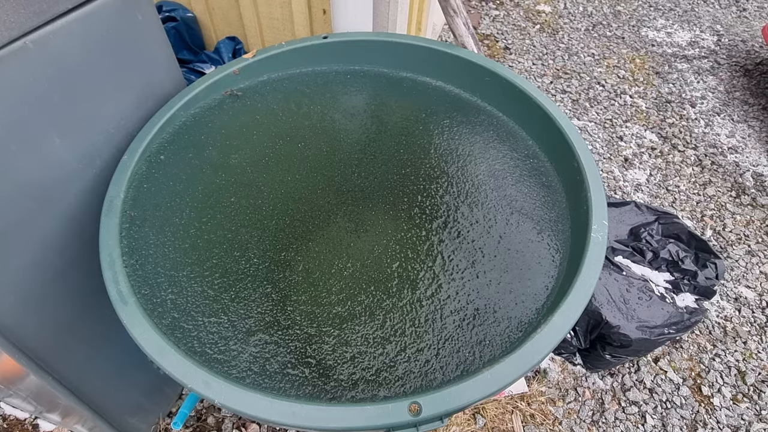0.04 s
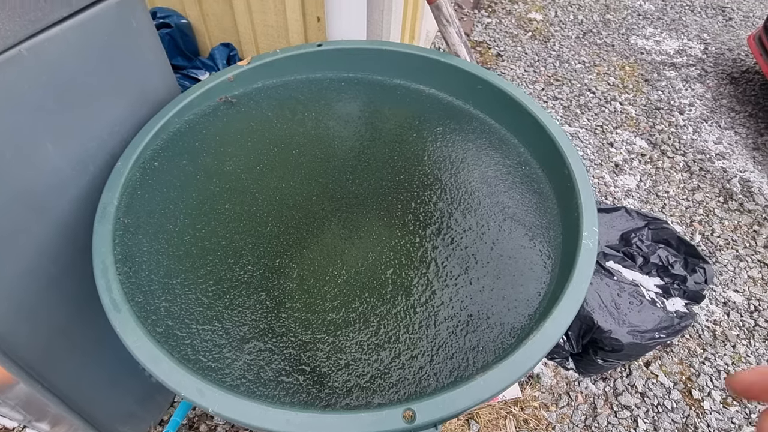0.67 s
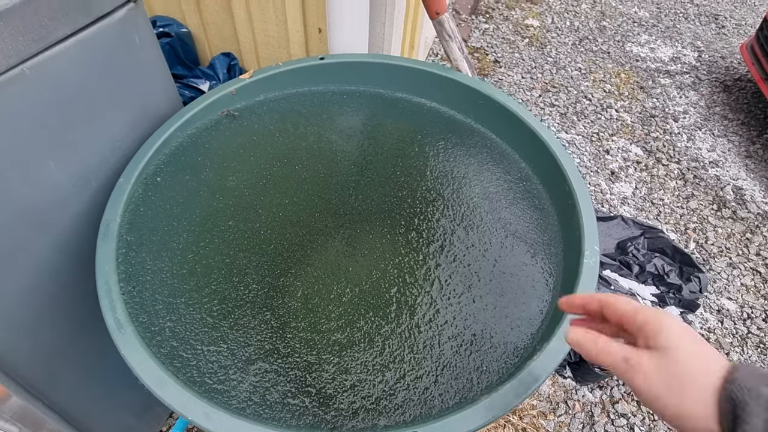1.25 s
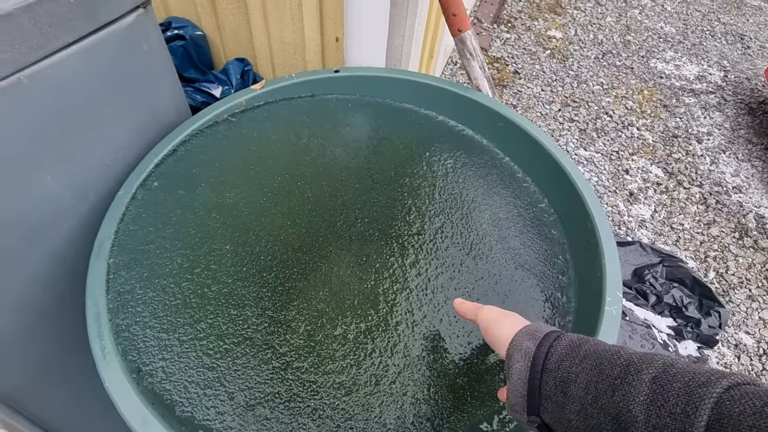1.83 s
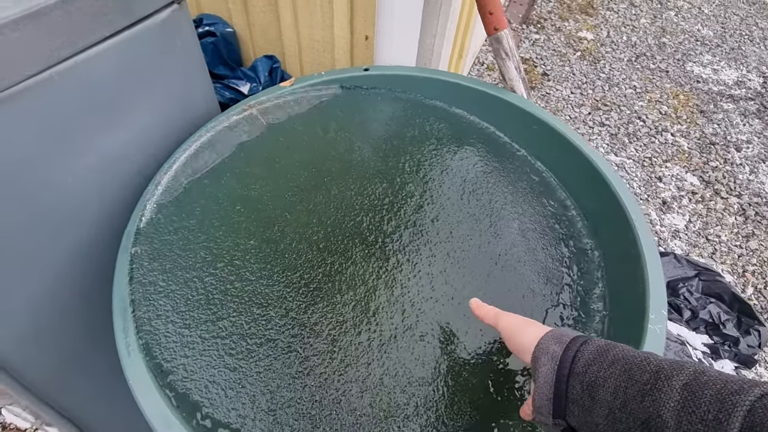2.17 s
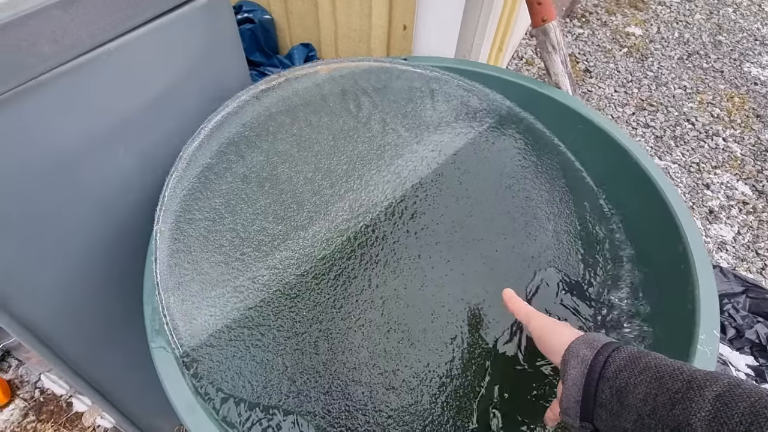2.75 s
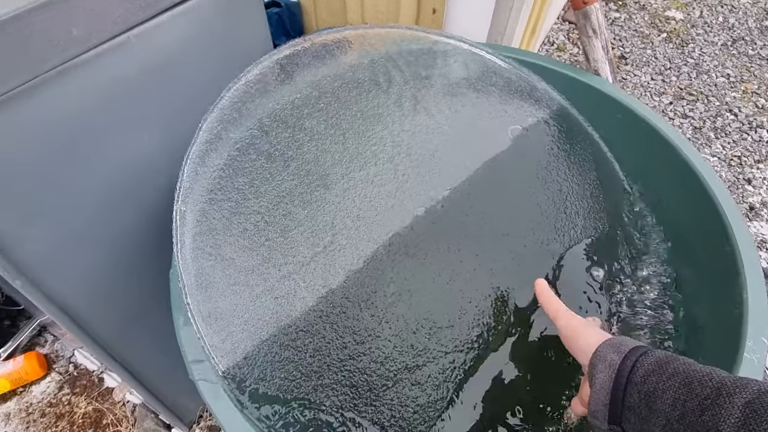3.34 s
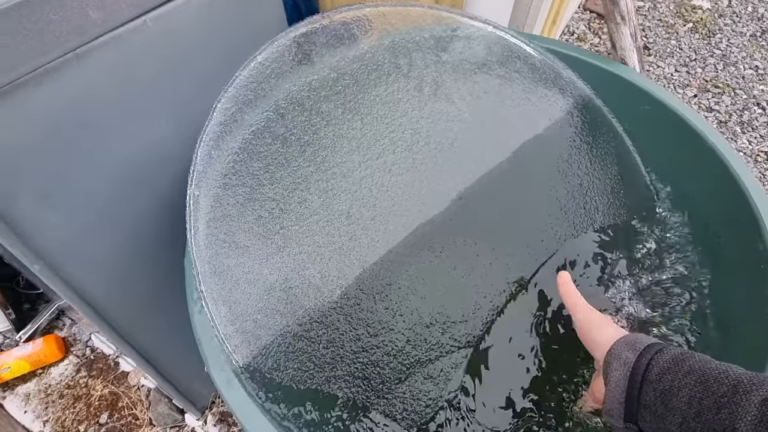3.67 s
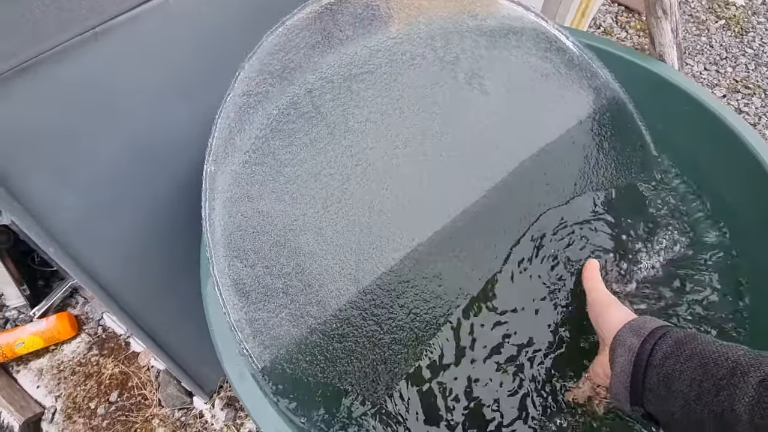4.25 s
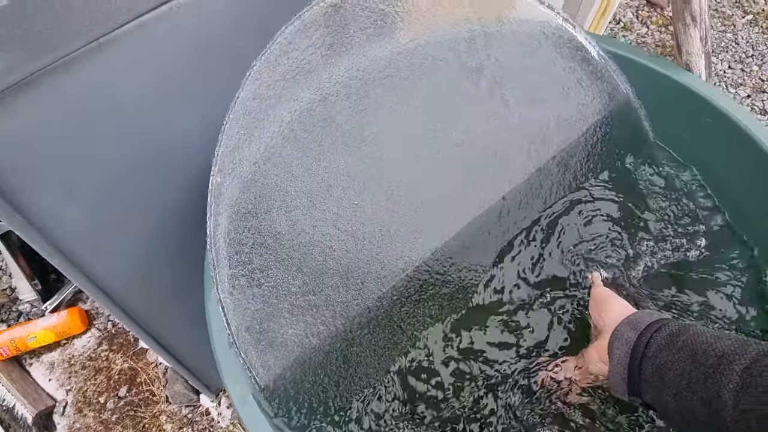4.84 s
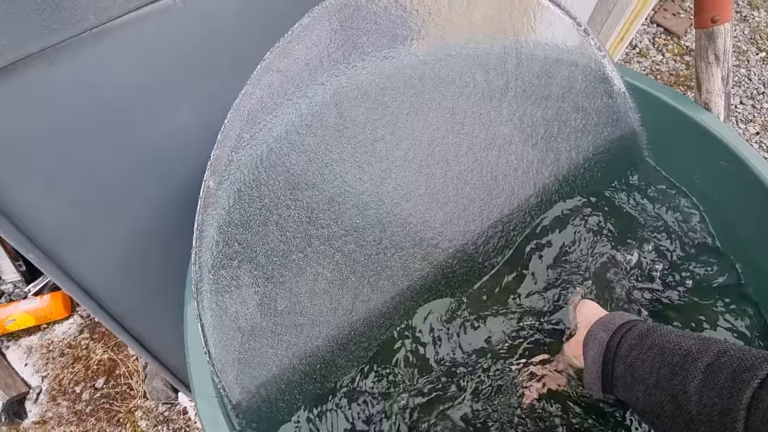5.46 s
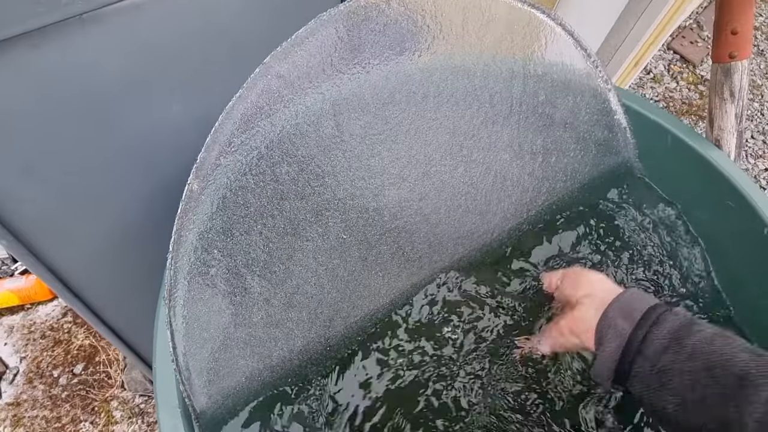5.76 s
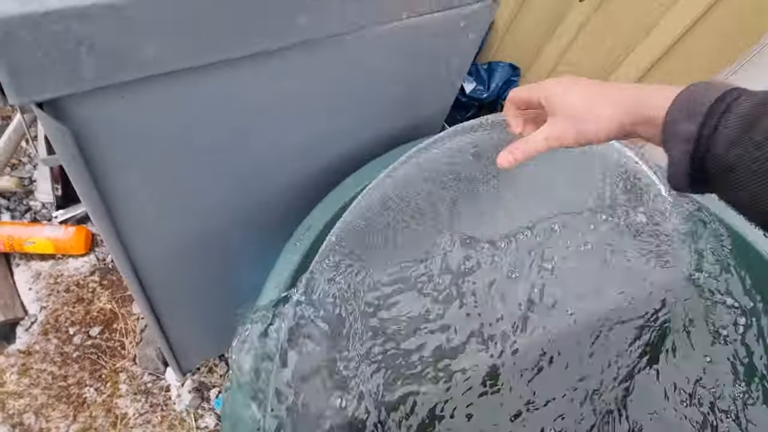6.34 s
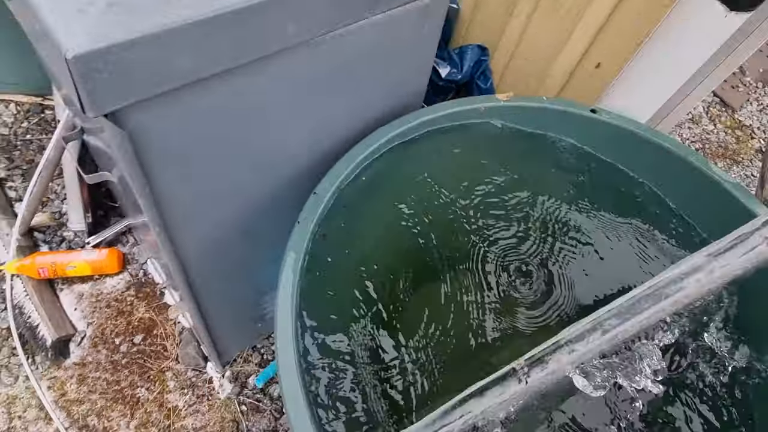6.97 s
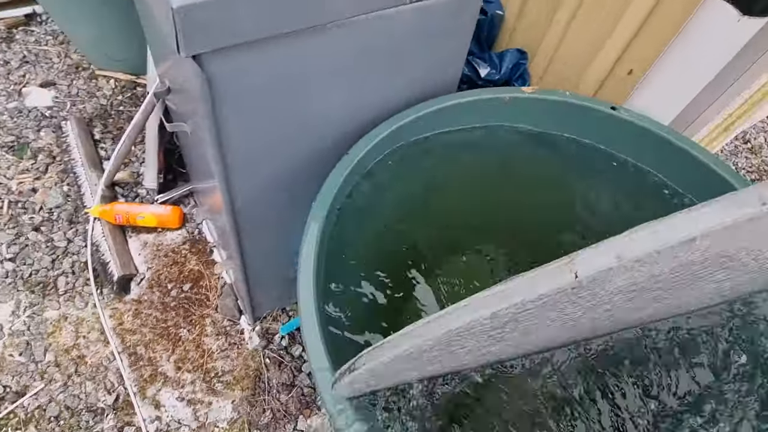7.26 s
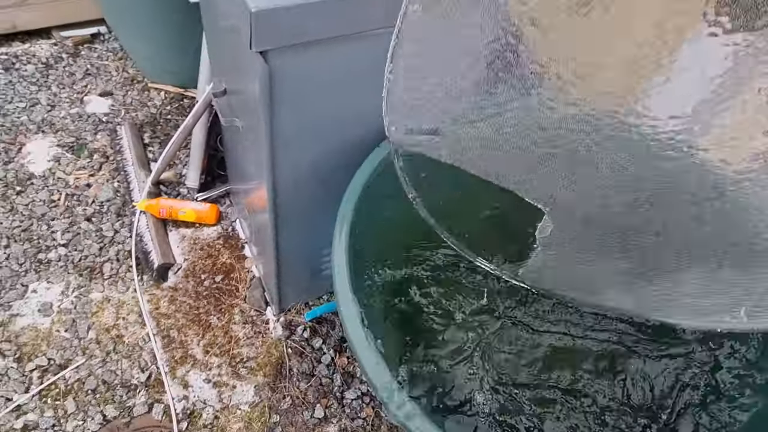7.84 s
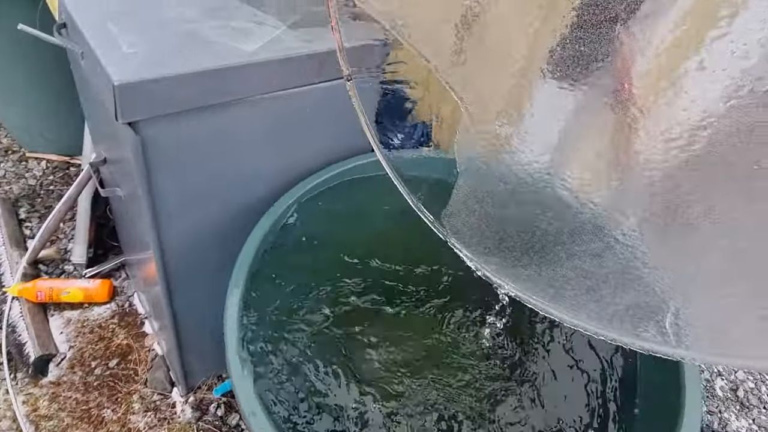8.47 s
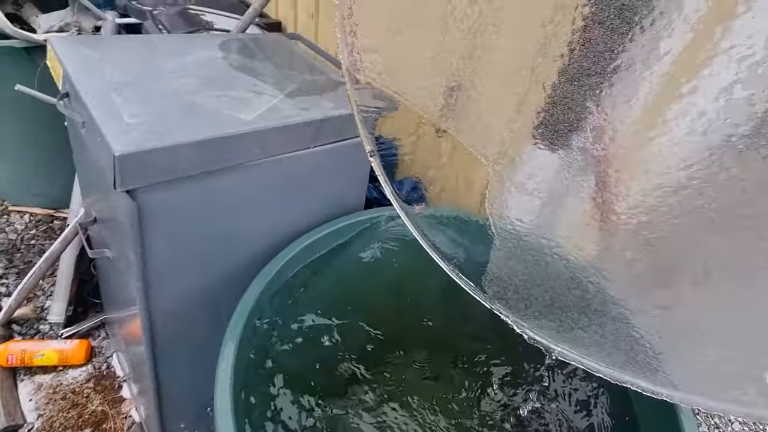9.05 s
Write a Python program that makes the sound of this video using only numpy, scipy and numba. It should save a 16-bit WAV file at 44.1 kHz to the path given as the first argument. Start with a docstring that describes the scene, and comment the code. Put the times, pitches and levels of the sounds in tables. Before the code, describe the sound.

A short, dry crackle comes right at the start, then faint open air and a low wind rumble. A sleeve rustles softly, and at about 1.6 seconds a sheet of ice snaps loose in a plastic tub of water with a small ping and a thud. From 2 to 3.3 seconds the ice scrapes and crackles along the tub. Water gurgles, gulps and plops over it from 3 seconds, easing off around 5. From about 5.9 seconds the sheet knocks dully against the tub and the water sloshes and slaps. The loudest splashing and pouring comes between 6.9 and 7.5 seconds as the ice is hauled out, with cracks and a brief low hum that sinks in pitch. Another scrape and bump follow near 7.7 seconds. From 8 seconds water trickles and drips into the tub, with a last short scrape at about 9.

```python
"""A short crackle; then, outdoors, ice snaps and water gurgles, sloshes, pours and drips as a hand
presses a round sheet of ice down in a plastic tub, tilts it and hauls it out. The ice cracks free,
scrapes the rim and bumps the tub into its low modes. The water is a crowd of bubbles, each a damped
oscillator: large ones gulp, small ones tinkle, the finest fizz. The tub wall reflects these sounds,
and wind rumbles beneath them."""
import sys
import numpy as np
from scipy import signal
from scipy.fft import rfft, irfft, next_fast_len
from scipy.io import wavfile
from scipy.ndimage import uniform_filter1d, map_coordinates
from numba import njit

SR = 44100
rng = np.random.default_rng(int(sys.argv[2]) if len(sys.argv) > 2 else 0)


def master_out(mix):
    """Clip the mix to full scale and print it as 16-bit PCM to the path in sys.argv[1]."""
    frames = np.transpose(np.atleast_2d(mix))
    ceiling = np.clip(frames, -1, 1)
    pcm = np.round(ceiling * 32767).astype(np.int16)
    wavfile.write(sys.argv[1], SR, pcm)


N = 401751

# Levels are relative within each table; balance is left minus right.
# Crackles, ice cracks and wet slaps: t/s, level/dB, body/dB, sizzle/dB, t60/s, balance/dB
CRACKS = [(.149, -15, -33, 13, 0.0048, 7), (.153, -36, -8.5, -4, .05, 3), (.170, -28.5, -7, 0, .017, -12.5),
          (.175, -24, -16.5, 0.5, 0.031, -1), (.185, -29, -8.5, -5, 0.0091, -3.5),
          (1.636, -38.5, -4.5, -5, .052, 0), (1.641, -32.5, -7, -1, .15, -0.5),
          (1.651, -31, -7, 0, .06, -3), (1.655, -18.5, -14, 5, 0.04, 3), (1.817, -45, -14, -5, 0.07, 2),
          (2.332, -36.5, -7, -17, 0.024, -2), (2.562, -34, -12, -19, .025, 5),
          (2.861, -32, -20, -6, .015, 2), (3.012, -36, 5, -10, 0.038, -1), (3.025, -27, 4, -5, 0.021, 0.5),
          (3.130, -26.5, -24, 11.5, 0.045, 1), (3.174, -32, -1.5, 4, .032, 1.5),
          (3.201, -25.5, -10.5, 6, 0.024, 0), (3.278, -26.5, -11, 19, 0.021, 2),
          (3.745, -36, -20, 6, .027, -2), (4.088, -35.5, -9, 0, .022, -2), (4.319, -37, -7, -7, 0.023, -3),
          (4.540, -27.5, -29, 23, .012, -4), (5.062, -37.5, 6, 7, .04, 1), (5.070, -24.5, -7, -3, .028, -2),
          (5.088, -38, 2, -3, .04, -1), (5.712, -26.5, -27.5, 33, 0.013, 5),
          (5.864, -32.5, 1.5, -4, 0.027, 1), (6.242, -29, -7, 14, 0.07, 2),
          (6.377, -31.5, 3.5, 1, 0.014, 2), (6.727, -27.5, -22, -1, .02, 10),
          (6.868, -24, 0.5, 1.5, 0.022, -2), (6.906, -17.5, 0.5, -8, .012, -5),
          (7.116, -21.5, -11, -2, .012, -2), (7.136, -17, -11, 4, .016, -4),
          (7.159, -15.5, -6.5, 1, 0.012, -4.5), (7.285, -20, -2.5, -15, .011, -2),
          (7.713, -20, -13, -11, 0.019, 4), (7.721, -23.5, -22, -2, 0.084, 2),
          (7.993, -28.5, -6, 11, 0.026, -4), (8.050, -18.5, -18, 3, 0.028, 0),
          (8.129, -27.5, -16, 16, .04, -8.5), (8.286, -28, -13, 3, .03, 1), (8.301, -29, -18, -6, .039, 4),
          (8.335, -31, -7.5, -6, 0.031, 0), (8.548, -30.5, -27, -3, .016, 9)]
# Buffets of wind and handling: t/s of the peak, half-width/s, level/dB
BUFFETS = [(.54, 0.082, -48.5), (1.0, 0.091, -50), (1.7, .06, -53), (2.42, 0.22, -57.5),
           (6.32, 0.14, -52.5), (7.58, .15, -41), (8.1, .2, -52), (8.46, 0.082, -46)]
# Low booms of water and sheet: t/s, f/Hz, level/dB, t60/s
BOOMS = [(1.641, 200, -25, 0.057), (1.675, 69, -40, 0.28), (3.009, 270, -29.5, 0.051),
         (5.864, 268, -24, 0.067), (6.240, 300, -33, 0.045), (6.363, 349, -23.5, 0.082),
         (6.370, 247, -19, 0.074), (6.713, 229, -39, .15), (6.752, 197.6, -28.5, 0.29),
         (7.378, 207, -25, 0.14), (7.419, 190, -24, 0.26), (7.809, 372, -30, 0.1), (8.09, 130, -31, 0.071),
         (8.446, 55.3, -21.5, 0.093), (9.065, 195, -33, 0.18)]

# Spectra of the crackling clicks, wind rumble and open air: f/Hz, level/dB
CRACK_SPECTRUM = [(100, -45.5), (600, -44), (1500, -2), (4200, 6), (7000, 1), (10800, -3), (13000, -1.5),
                  (16000, -3.5)]
RUMBLE_SPECTRUM = [(10, -34), (28, -10.5), (50, 2.5), (80, 2.5), (105, -4.5), (200, -21.5), (500, -70)]
AIR_SPECTRUM = [(60, -20), (150, -6.5), (360, 3), (480, -3.5), (1500, -14), (4000, -25.5), (8000, -36),
                (10800, -38), (13000, -27.5), (16000, -32)]
# Spectra of the water's four bands, low to high: f/Hz, level/dB
HEAVE_SPECTRUM = [(60, -28), (110, -5), (150, -7), (198, -0.5), (250, -3.5), (330, -7.5), (450, -26),
                  (900, -60)]
GULP_SPECTRUM = [(200, -32), (330, 3.5), (390, -2.5), (470, -2), (640, -1), (810, -3.5), (1000, 0),
                 (1600, -19)]
SPLASH_SPECTRUM = [(600, -12.5), (950, -4.5), (1200, -0.5), (1800, -3), (2400, -3.5), (3200, -1.5),
                   (5000, -19)]
SPRAY_SPECTRUM = [(1500, -26), (3000, -3), (4200, -2.5), (6000, -4), (8000, -4), (10800, -6), (13000, 0.5),
                  (16000, -2.5)]

# Flow over and off the sheet: t/s, level/dB, gulps re level/dB, spray re level/dB,
# churn (0 gentle gurgling, 1 broken splashing)
FLOW = [(1.75, -76.5, 3, 3, .8), (2.45, -67.5, 0, 6.5, 0.3), (2.98, -62, 1, 4, .35),
        (3.25, -48.5, -1, -0.5, 0.23), (3.85, -48, 5, -2, .18), (4.25, -52, -3, 2, .2),
        (4.75, -56.5, -5, .5, 0.21), (5.25, -61, 0, -1, .2), (5.53, -62.5, 0.5, 0.5, 0.5),
        (5.88, -53, -1.5, -2, 0.4), (6.08, -42, -7.5, 3.5, 0.28), (6.33, -46, -1, -0.5, .85),
        (6.6, -56, 2.5, 0, 0.8), (6.92, -33, -5.5, 4, .75), (7.42, -34, -2, -1, 0.35),
        (7.62, -46, -1, 1, 0.65), (7.92, -53.5, 0, 5.5, 0.95), (9.1, -61, -7, 5, .6)]
# Heave of the whole body of water: t/s, level/dB
ROCKING = [(1.8, -68), (3.4, -62.5), (5.4, -67.5), (6.1, -57), (6.45, -43.5), (6.58, -53.5), (6.85, -43),
           (7.55, -38), (7.92, -54.5), (9.1, -64)]
# Position of the splashing: t/s, balance/dB
SPLASH_BALANCE = [(1.8, 1), (5.9, 0), (6.3, 2.5), (6.9, 1.5), (7.35, -2), (7.75, 1.5), (8.1, -2.5),
                  (8.5, 3), (9.1, 3.5)]
# Surges: t/s, hold/s, level/dB, gulps re level/dB, spray re level/dB
SCRAPES = [(1.88, 0.032, -52, -5.5, 0), (1.985, 0.043, -50, -3.5, 3.5), (2.035, 0.023, -45.5, -3, -3.5),
           (2.335, 0.047, -51, -3, 4.5), (2.53, .04, -43.5, -1, -1), (2.62, .06, -61, 0, 9),
           (2.705, 0.022, -49, -1, -3.5), (2.77, 0.057, -57, 0, 6.5), (2.91, 0.018, -47.5, -4.5, -2.5),
           (3.012, .028, -38, 7, -2), (3.135, 0.016, -43.5, -6, 2), (3.175, 0.039, -41.5, -3, -2),
           (3.255, 0.031, -46, -4, 5.5), (7.70, 0.048, -38, -1, 13), (7.78, 0.022, -43, -4, 12),
           (9.06, .06, -40.5, -0.5, 8)]  # the ice edge grinds along the tub
GURGLES = [(2.27, 0.052, -56.5, 0, -11), (3.325, .015, -42.5, -8, -1), (3.425, 0.05, -40.5, -6, -2.5),
           (3.72, 0.036, -51, 7.5, 7.5), (3.79, 0.058, -43.5, 3, -3), (3.885, 0.04, -43, 2, -5.5),
           (3.995, 0.044, -43, 3, -10.5), (4.09, 0.037, -44, -5, -4), (4.175, .025, -46.5, 2, -18),
           (4.317, .02, -41.5, -6, -1.5), (4.39, .065, -47, -1, 1), (4.55, .04, -53, 4, 1),
           (4.70, 0.012, -52, -9, 4.5), (5.298, 0.019, -47, -9, -1.5), (5.425, 0.026, -54.5, 0, 2),
           (5.60, 0.02, -46.5, -7, 3), (5.708, .03, -48.5, -7, -1.5), (5.955, .045, -31, -13, -1)]  # water wells over sheet and hand
SLOSHES = [(5.868, .035, -41.5, 4.5, -17), (6.17, .035, -38, 4, 6.5), (6.243, 0.017, -41, 2, 2),
           (6.37, 0.022, -44, 5.5, -2), (6.425, 0.044, -40.5, -1.5, 0), (6.672, .02, -47, -3, 2),
           (6.75, .035, -35.5, -5, -3), (6.92, 0.082, -24.5, -9.5, -1), (7.065, .035, -29, -9, -6),
           (7.335, .03, -28, -7, -5), (7.385, 0.045, -30.5, 1.5, 0.5), (8.17, 0.028, -41, 0, 4)]  # hand and sheet shove the water
DRIBBLES = [(7.982, .028, -43, -4, 7.5), (8.032, 0.036, -32.5, -15, 2.5), (8.10, 0.059, -45.5, -6, 11),
            (8.297, 0.033, -33.5, -18, -8), (8.355, 0.036, -52, -9, 4), (8.51, 0.035, -52.5, -13, 14.5),
            (8.695, 0.0087, -64, -10, 7), (8.778, 0.015, -48.5, -4, 8.5), (8.82, 0.051, -54.5, -8.5, 10)]  # runnels fall from the lifted sheet
# Character of each kind of surge: attack/s, release t60/s, heave re gulps/dB, churn
SCRAPE_SHAPE = (.018, 0.16, -16, .9)
GURGLE_SHAPE = (.01, 0.24, -18.5, .24)
SLOSH_SHAPE = (.015, 0.157, -2, 0.78)
DRIBBLE_SHAPE = (0.03, 0.08, -5.5, .85)

# Drops, bubbles and short plopping knocks: t/s, starting f/Hz, level/dB, t60/s
PLOPS = [(2.244, 1980, -46, .034), (2.298, 900, -44.5, .05), (2.331, 1740, -37.5, .034),
         (2.705, 2190, -39.5, .043), (3.058, 434, -30, .059), (3.234, 2580, -32, .035),
         (3.436, 1830, -34, .027), (3.522, 993, -33.5, .054), (3.62, 400, -38, .13),
         (3.657, 1590, -32.5, .029), (3.721, 705, -30.5, .085), (3.790, 550, -27, .19),
         (3.812, 400, -32, .15), (3.892, 476, -31, .085), (3.918, 364, -27, .083), (4.03, 450, -34, .12),
         (4.319, 1020, -24, .035), (4.394, 990, -28, .036), (4.642, 3220, -29.5, .022),
         (4.931, 5600, -38, .008), (5.158, 2360, -36.5, .043), (5.248, 5700, -41, .014),
         (5.300, 2790, -27.5, .02), (5.608, 2950, -30.5, .009), (5.953, 1620, -25.5, .036),
         (5.964, 1150, -27, .039), (5.977, 1270, -20, .04), (5.978, 2930, -14, .017),
         (5.985, 1066, -21.5, .05), (6.007, 950, -30, .05), (6.040, 1025, -31.5, .072),
         (6.962, 780, -16.5, .03), (6.996, 1130, -18, .011), (7.001, 2460, -21, .022),
         (7.115, 748, -21, .025), (7.135, 815, -14.5, .022), (7.159, 797, -15.5, .022),
         (7.212, 1410, -20, .027), (7.283, 2140, -22.5, .027), (7.325, 1860, -19, .04),
         (7.352, 1420, -20, .042), (7.358, 870, -22, .043), (7.392, 705, -26.5, .06),
         (7.418, 534, -26.5, .046), (7.428, 1110, -23.5, .036), (7.540, 1450, -26.5, .021),
         (7.967, 4170, -26, .012), (7.992, 1280, -25.5, .037), (8.031, 2620, -14.5, .014),
         (8.032, 4700, -20, .017), (8.127, 5200, -21, .017), (8.177, 5650, -18, .01),
         (8.428, 4800, -23.5, .021), (8.458, 5360, -22, .015), (8.603, 1960, -29.5, .014),
         (8.668, 6700, -27.5, .012), (8.922, 6860, -28, .006), (8.990, 5800, -25.5, .004)]
# Slowly rising bubbles: t/s, starting f/Hz, level/dB, life/s
BLOOPS = [(4.175, 561, -51, 0.058), (4.600, 1210, -57, 0.043), (4.965, 734, -56, 0.058),
          (5.320, 1150, -58, .042), (8.711, 515, -38, .072)]
# Bumps of the sheet on the tub: t/s, level/dB
KNOCKS = [(5.863, -20.5), (5.886, -22.5), (6.201, -21.5), (6.247, -23), (6.375, -22), (6.850, -18.5),
          (6.868, -15), (6.9043, -14.5), (7.752, -18.5), (8.165, -26)]
# Modes of the filled tub: f/Hz, level/dB, t60/s
TUB_MODES = [(200, -22, 0.12), (309, -4.5, 0.04), (387, 0, 0.038), (576, 0, 0.03), (790, 0, 0.015),
             (1480, -3, 0.0096)]
# Air pocket under the lifted sheet: t/s, f/Hz, level/dB
POCKET = [(6.88, 110.5, -75), (6.95, 105.6, -43), (7.01, 97.8, -36), (7.08, 87.4, -43), (7.17, 82, -39),
          (7.24, 82, -44), (7.32, 80, -75)]


def amp(db):
    """Amplitude grows tenfold every 20 dB."""
    return 10 ** (np.asarray(db) / 20)


def unit(x):
    """Normalisation to an rms of 1."""
    return x / np.sqrt(np.mean(x ** 2) + 1e-20)


def curves(rows):
    """Linear interpolation of each column after the time, one value a sample."""
    times, *columns = np.transpose(rows)
    return [np.interp(np.arange(N) / SR, times, column) for column in columns]


def wobble(rate):
    """Spline interpolation through random knots, rate of them a second."""
    return map_coordinates(rng.standard_normal(int(N * rate / SR) + 4), [np.arange(N) * rate / SR])


def colour(x, spectrum):
    """Filtering multiplies the spectrum by a gain: (f/Hz, level/dB) points on a log axis."""
    n = x.shape[-1]
    padded = next_fast_len(n + 2048)
    hz, db = np.transpose(spectrum)
    gain = amp(np.interp(np.log(np.fft.rfftfreq(padded, 1 / SR) + 1), np.log(hz), db))
    return irfft(rfft(x, padded) * gain, padded)[..., :n]


def noise(spectrum, side_db, size=N):
    """Coloured noise of rms 1; the side signal decorrelates the ears."""
    mid, side = colour(rng.standard_normal((2, size)), spectrum) * amp([[0], [side_db]])
    return unit(np.array([mid + side, mid - side]))


def pan(db):
    """An interaural level difference places a source left or right."""
    return amp(np.array([[.5], [-.5]]) * db)


def add(out, start, sound):
    """Superposition of a sound on out, from start in seconds."""
    part = out[:, max(round(start * SR), 0):][:, :sound.shape[-1]]
    part += sound[..., :part.shape[1]]


@njit
def ring(rows, size, sr):
    """Damped oscillators that glide upward, as bubbles do near the surface."""
    out = np.zeros((2, size))
    for k in range(len(rows)):
        onset, hz, gain, t60, rise, ear_phase = rows[k]
        start = int(onset * sr)
        for i in range(min(int(t60 * sr), size - start)):
            t = i / sr
            phase = 2 * np.pi * hz * t * (1 + rise * t / t60 / 2)
            level = gain * np.exp(-np.log(1000) * t / t60) * (1 - np.exp(-3 * hz * t))
            out[0, start + i] += level * np.sin(phase + ear_phase / 2)
            out[1, start + i] += level * np.sin(phase - ear_phase / 2)
    return out


def cracks(attack=.0012):
    """Crackles, cracks and slaps are transients: a decaying cluster of tiny clicks over a dull thud."""
    out, t = np.zeros((2, N)), np.arange(SR // 6) / SR
    for start, db, body_db, sizzle_db, t60, balance in CRACKS:
        clicks = rng.standard_normal((2, len(t)))
        clicks *= amp(3 * np.repeat(rng.standard_normal(len(t)), 24)[:len(t)])  # grainy level
        snap = unit(colour(colour(clicks, CRACK_SPECTRUM), [(4000, 0.0071), (11000, sizzle_db)]))
        body = noise([(100, -14), (250, -2.5), (450, 1.5), (750, -4), (1500, -5), (4000, -29.5)],
                     side_db=-6, size=len(t))
        burst = snap * amp(-60 * t / t60) + amp(body_db - 60 * t / (t60 + 0.0081)) * body
        add(out, start - attack / 2, amp(db + 1.5) * pan(balance) * burst * np.minimum(t / attack, 1))
    return out


def reflections(x, t60=0.036, delay=0.0022):
    """Scattering from tub wall and shed: convolution with a short tail, different at each ear."""
    t = np.arange(SR // 5) / SR
    tail = noise([(100, -8), (500, -11), (2000, 3), (15000, -2.5)], side_db=1.5, size=len(t))
    tail *= amp(-60 * t / t60) * (t > delay)
    return signal.fftconvolve(x, tail / np.linalg.norm(tail[0]), axes=1)[:, :N]


def outdoors(lull_db=-60):
    """Buffets of wind and handling add in power to a low rumble, which fades in with faint open air."""
    t = np.arange(N) / SR
    buffets = sum(amp(db) ** 2 * np.exp(-((t - peak) / width) ** 2) for peak, width, db in BUFFETS)
    swell = np.sqrt(amp(lull_db) ** 2 + buffets)
    rumble = swell * amp(1.6 * wobble(9)) * noise(RUMBLE_SPECTRUM, side_db=-13)
    fade_in, = curves([(.40, 0), (.43, 0.27), (.55, 0.97)])
    return fade_in * (rumble + amp(-62.5) * noise(AIR_SPECTRUM, side_db=-3.5))


def sleeve():
    """Friction of cloth gives a faint broadband rustle as the arm reaches out."""
    level_db, = curves([(1.1, -100), (1.35, -73.5), (1.6, -67), (1.75, -71), (2.0, -100)])
    spectrum = [(1500, -13), (4000, -6.5), (8000, -3), (10800, -9), (14000, -6)]
    return amp(level_db + 1.5 * wobble(25)) * noise(spectrum, side_db=-0.5)


def booms(attack=0.0086):
    """Large air pockets and the flexing sheet resonate, each boom a single damped mode."""
    out, t = np.zeros((2, N)), np.arange(SR // 3) / SR
    for start, hz, db, t60 in BOOMS:
        envelope = amp(db - 60 * t / t60) * (1 - np.exp(-t / attack))
        add(out, start, pan(-3) * envelope * np.sin(2 * np.pi * hz * t))
    return out


def ice_ping(start=1.6565, hz=4250, db=-17, t60=0.023):
    """Free vibration: the thin ice rings in two close modes as it snaps off the wall."""
    modes = [[start, hz, amp(db), t60, 0, .9],
             [start + 0.00101, hz * 0.96, amp(db - 16), 3 * t60, 0, -1.2]]
    return ring(np.array(modes), N, SR)


def stirring():
    """Incoherent flow and surges add in power: gives four band levels in dB and power-weighted churn."""
    flow_db, gulp_db, spray_db, flow_churn = curves(FLOW)
    power = amp([curves(ROCKING)[0], flow_db + gulp_db, flow_db, flow_db + spray_db]) ** 2
    churned = flow_churn * power[2:3]
    t = np.arange(SR // 3) / SR
    kinds = [(SCRAPES, SCRAPE_SHAPE), (GURGLES, GURGLE_SHAPE),
             (SLOSHES, SLOSH_SHAPE), (DRIBBLES, DRIBBLE_SHAPE)]
    for surges, (attack, release, heave, churn) in kinds:
        for peak, hold, db, gulp, spray in surges:
            shape = np.minimum(t / attack, 1) * amp(db - 60 * np.maximum(t - attack - hold, 0) / release)
            surge = (amp([[gulp + heave], [gulp], [0], [spray]]) * shape) ** 2
            add(power, peak - attack, surge)
            add(churned, peak - attack, churn * shape ** 2)
    return 10 * np.log10(power), np.clip(churned[0] / power[2], 0, 1)


def swarm(level_db, peak_rate, low_hz, high_hz, cycles, rise, spread_db, thinning=.45):
    """Random bubble resonances, sparser where level_db is low, evened out toward unit power."""
    count = int(peak_rate * N / SR)
    when, pitch, luck, climb = rng.random((count, 4)).T
    strength, life, path = rng.standard_normal((count, 3)).T
    hz = low_hz * (high_hz / low_hz) ** pitch
    t60 = cycles / hz * np.exp(life / 2)
    gain = amp(spread_db * np.clip(strength, -2, 2)) * np.sqrt(hz / high_hz) * rng.choice([-1, 1], count)
    ear_phase = 2 * np.pi * hz * path * 0.0002825  # unequal travel times to the ears
    rows = np.column_stack([when * N / SR, hz, gain, t60, 2 * rise * climb, ear_phase])
    born = luck < amp(thinning * (level_db[(when * N).astype(int)] - level_db.max()))
    bubbles = ring(rows[born], N, SR)
    power = np.mean(bubbles ** 2, axis=0)
    power = np.abs(uniform_filter1d(uniform_filter1d(power, size=2200), size=2200))
    return bubbles / np.sqrt(power + np.mean(power) / 100)


def spatter(level_db, spectrum, peak_rate, spread_db, rush_db, side_db):
    """Heavy damping turns rings into tiny impacts, fused by the rush of the water; rms 1."""
    low_hz, high_hz = spectrum[1][0], spectrum[-2][0]
    impacts = swarm(level_db, peak_rate, low_hz, high_hz, 7, rise=0, spread_db=spread_db, thinning=.3)
    return unit(unit(colour(impacts, spectrum)) + amp(rush_db) * noise(spectrum, side_db))


def water():
    """Smaller bubbles resonate higher: heave, gulps, tinkle, spray. Churn trades ringing for spatter."""
    (heave_db, gulp_db, bubble_db, spray_db), churn = stirring()
    calm, broken = np.sqrt(1 - churn), np.sqrt(churn)
    heave = swarm(heave_db, 400, low_hz=85.4, high_hz=386, cycles=18, rise=0.058, spread_db=2)
    heave = unit(colour(heave, HEAVE_SPECTRUM))
    gulps = calm * swarm(gulp_db, 260, low_hz=370, high_hz=1005, cycles=80, rise=0.1, spread_db=4.5)
    gulps += broken * spatter(gulp_db, GULP_SPECTRUM, 700, spread_db=7.5, rush_db=-8, side_db=0)
    rings = swarm(bubble_db, 900, low_hz=947.5, high_hz=3470, cycles=72, rise=0.19, spread_db=4.5)
    splash = spatter(bubble_db, SPLASH_SPECTRUM, 2600, spread_db=8.5, rush_db=-0.5, side_db=2.5)
    bubbles = calm * rings + broken * splash
    droplets = swarm(spray_db, 700, low_hz=3093, high_hz=8970, cycles=98, rise=0.11, spread_db=8)
    film = spatter(spray_db, SPRAY_SPECTRUM, 4500, spread_db=4.5, rush_db=0, side_db=0.5)
    fizz = film * (0.65 + 0.37 * broken) + 0.5 * calm * droplets
    # a thin trickle arrives in bunches, a full pour flows evenly
    bunching_db = np.interp(spray_db, [-55, -30], [3.8, 1.3])
    clumps = wobble(75)
    spray_clumps = 1.09 * clumps + 1.03 * np.array([wobble(90), wobble(90)])
    deep = amp(heave_db - 5) * heave + amp(gulp_db - 4.5) * gulps
    tinkle = amp(bubble_db - 4.5 + .5 * bunching_db * clumps) * bubbles * pan(-1.5)
    spray = amp(spray_db - 3 + bunching_db * spray_clumps) * fizz * pan(0.35)
    fade_in, = curves([(1.66, 0), (1.78, 1)])
    balance, = curves(SPLASH_BALANCE)
    return fade_in * (deep * pan(-2.1) + (tinkle + spray) * pan(balance))


def plops(rise=0.21, tick_db=-7, tick_t60=0.018, wide_hz=1500):
    """Drops, bubbles and short plopping knocks as damped resonances: a tick and a brief pitched ring."""
    starts, hz, db, t60 = np.transpose(PLOPS)
    ear_phase = np.pi / 2 * np.tanh(hz / wide_hz) * rng.choice([-1, 1], len(hz))
    out = ring(np.column_stack([starts, hz, amp(db), t60, np.full(len(hz), rise), ear_phase]), N, SR)
    t = np.arange(SR // 20) / SR
    for start, f, level in zip(starts, hz, db):
        tick = noise([(f / 4, -20), (f, 0), (f * 2, -8), (f * 8, -26)], side_db=-5, size=len(t))
        add(out, start, amp(level + tick_db - 60 * t / tick_t60) * tick)
    return out


def bloops(glide=0.81):
    """A rising, wobbling bubble loses mass loading, so its pitch shoots up before it bursts."""
    out, wavering = np.zeros((2, N)), amp(0.66 * wobble(110))
    for start, hz, db, life in BLOOPS:
        t = np.arange(int(life * SR)) / SR
        pitch = hz / np.maximum(1 - glide * (t / life) ** 2, .29)
        envelope = (1 - np.exp(-t / 0.00049)) * np.minimum(1, (life - t) / 0.0046)
        envelope *= wavering[int(start * SR):][:len(t)]
        add(out, start, amp(db) * pan(-2.7) * envelope * np.sin(2 * np.pi * np.cumsum(pitch) / SR))
    return out


def knocks(attack=0.001):
    """Impact excites the damped modes of the filled plastic tub, a little differently each time."""
    out, t = np.zeros((2, N)), np.arange(SR // 6) / SR
    for start, db in KNOCKS:
        thud = np.zeros(len(t))
        for hz, level, t60 in TUB_MODES:
            decay = amp(level + rng.normal(0, 2.8) - 60 * t / t60)
            thud += decay * np.sin(2 * np.pi * hz * rng.normal(1, 0.031) * t)
        add(out, start, amp(db - 7) * pan(-3.5) * thud * (1 - np.exp(-t / attack)))
    return out


def air_pocket(octave_db=-5):
    """Cavity resonance: the hollow under the sheet hums and sinks in pitch as it grows."""
    hz, db = curves(POCKET)
    phase = 2 * np.pi * np.cumsum(hz * (1 + 0.0141 * wobble(30))) / SR
    hum = np.sin(phase) + amp(octave_db + 2.4 * wobble(6.1)) * np.sin(2 * phase)
    return (db > -70) * amp(db) * hum * pan(-1.8)


def scene():
    """Superposition of the direct sound, its reflections and the background."""
    direct = water() + cracks() + ice_ping() + plops() + bloops() + knocks() + booms() + air_pocket()
    return direct + amp(-12.5) * reflections(direct) + outdoors() + sleeve()


def record(dry, top_hz=16100):
    """A steep low-pass filter limits the bandwidth."""
    return colour(dry, [(top_hz, 0), (top_hz + 300, -90)])


dry = scene()
out = record(dry)
master_out(out)
```